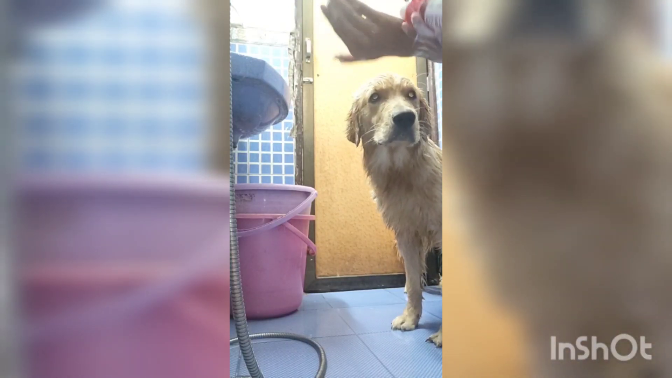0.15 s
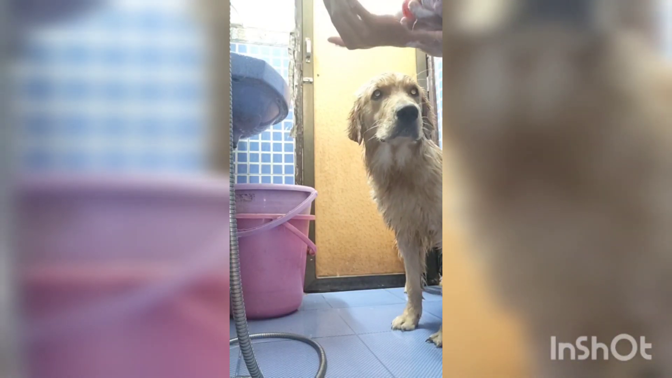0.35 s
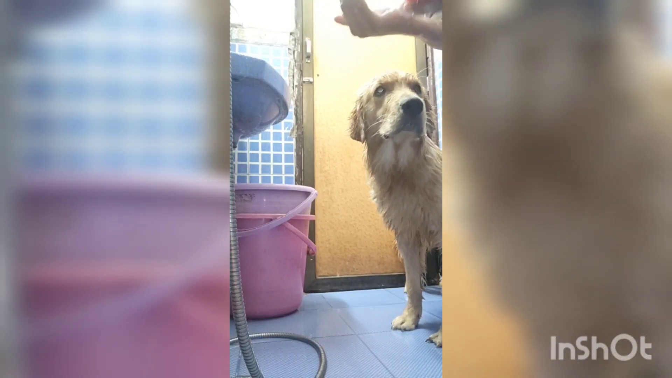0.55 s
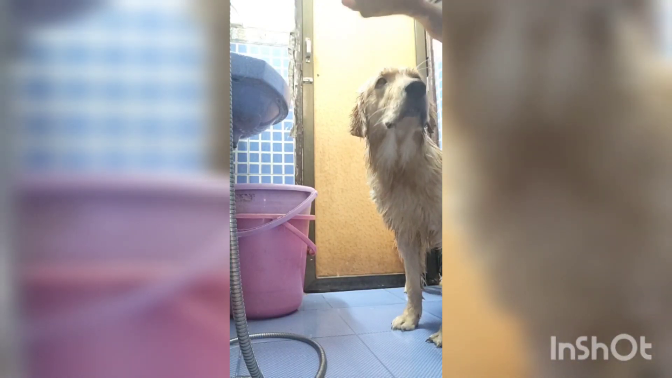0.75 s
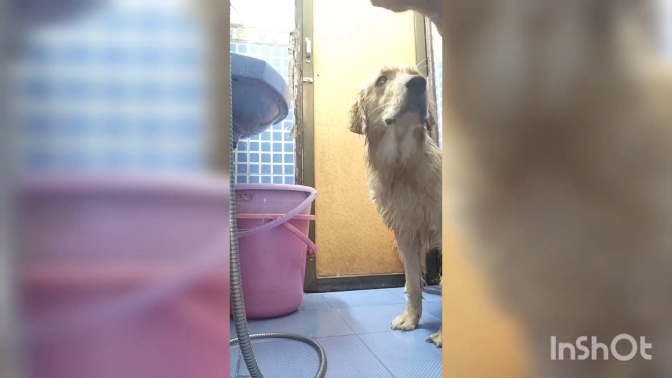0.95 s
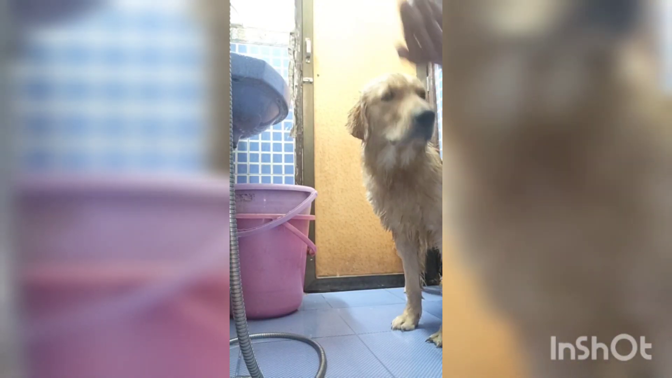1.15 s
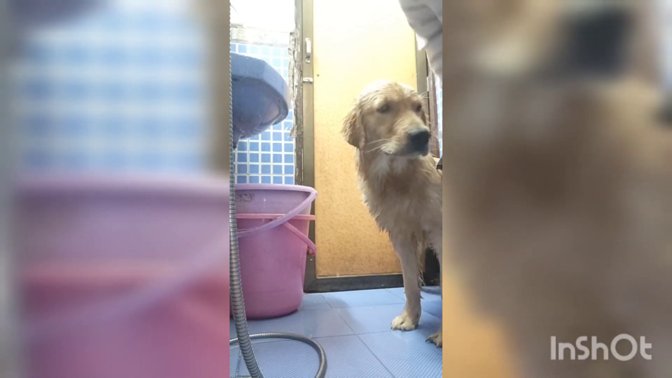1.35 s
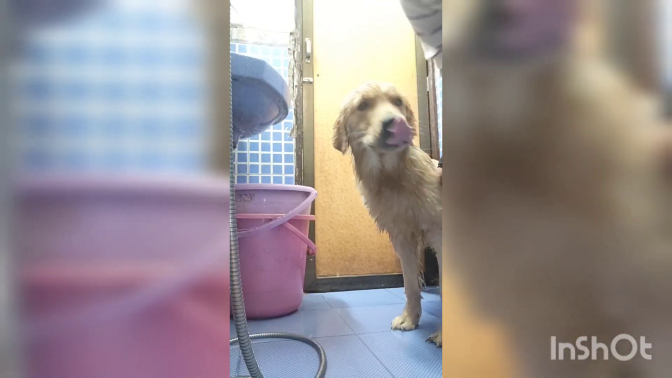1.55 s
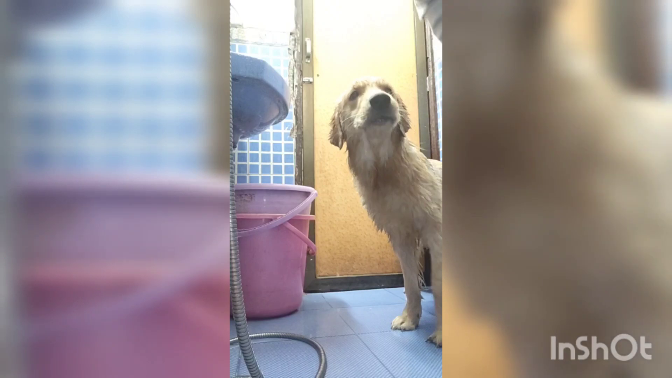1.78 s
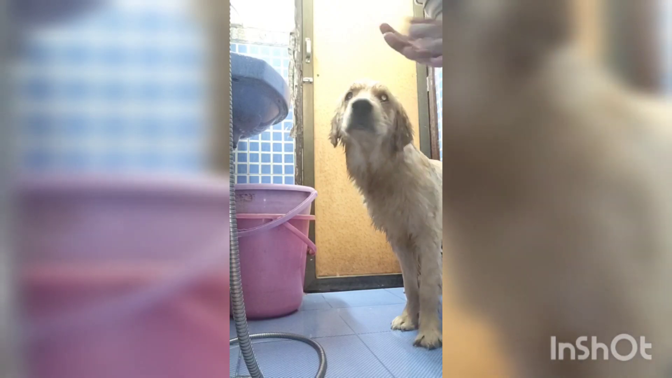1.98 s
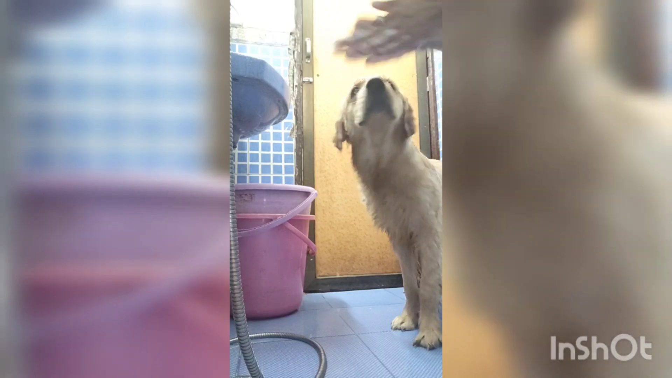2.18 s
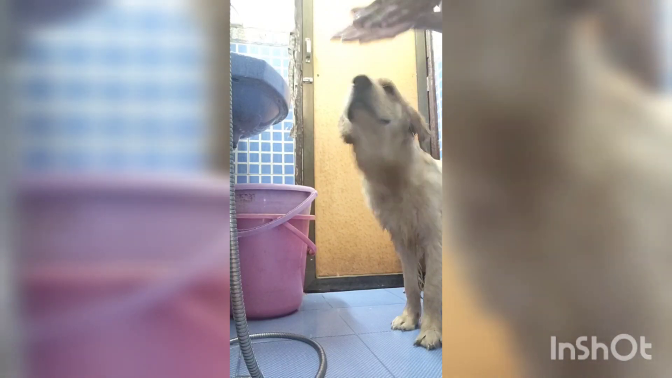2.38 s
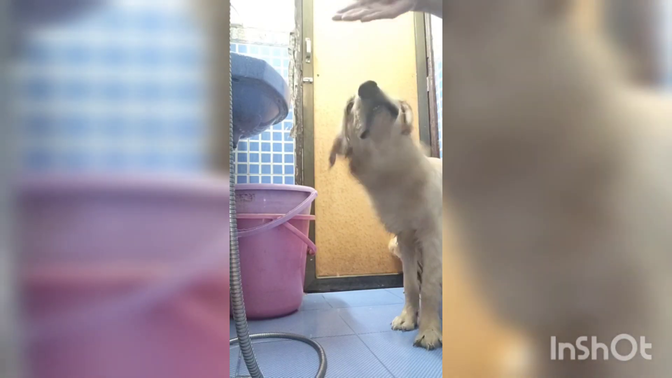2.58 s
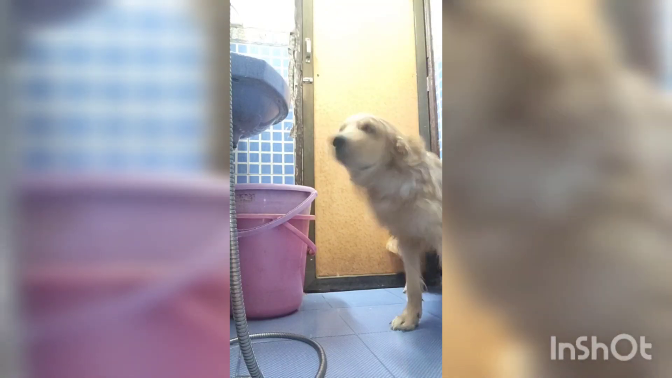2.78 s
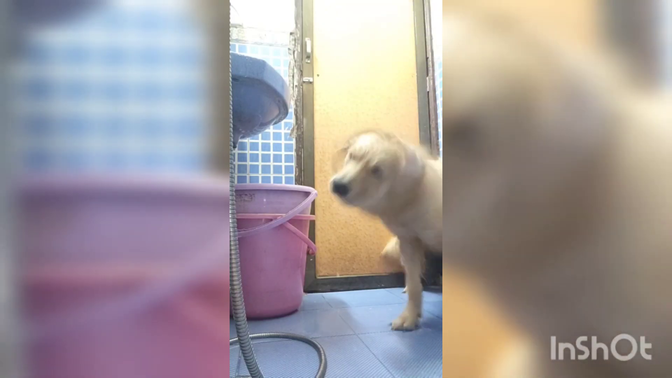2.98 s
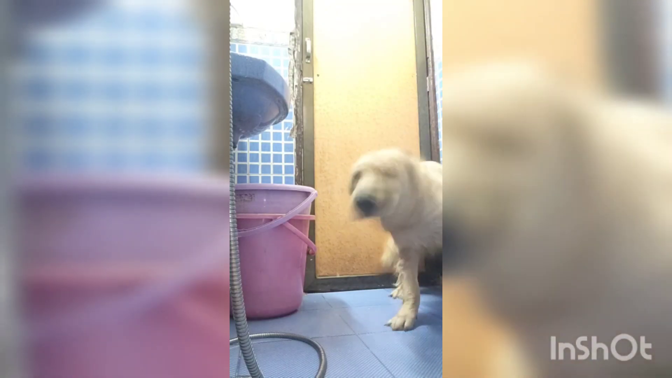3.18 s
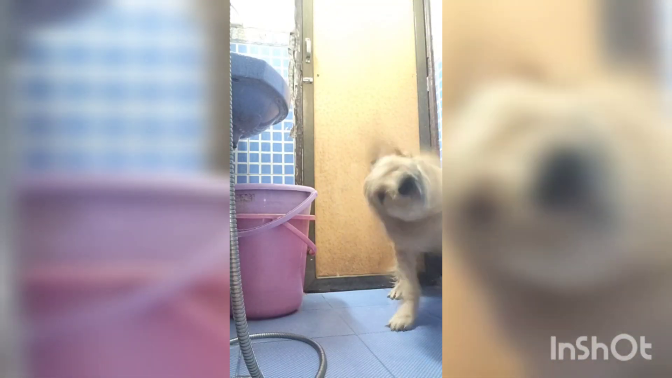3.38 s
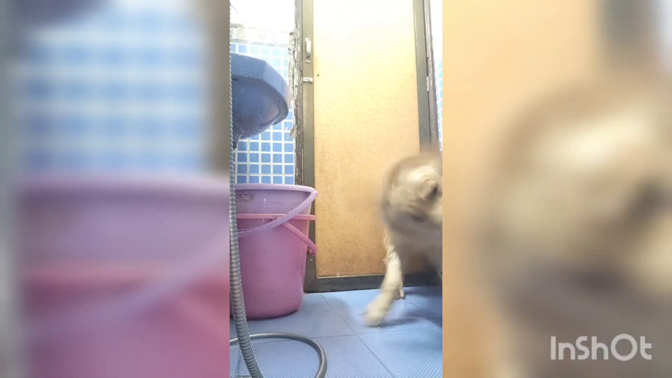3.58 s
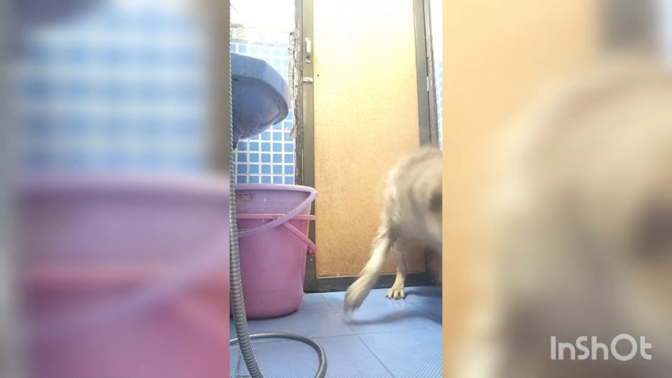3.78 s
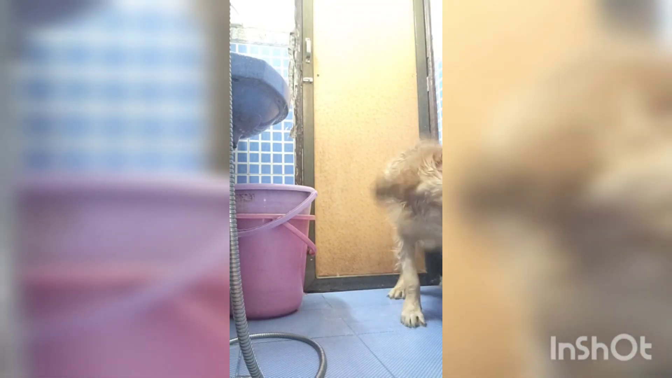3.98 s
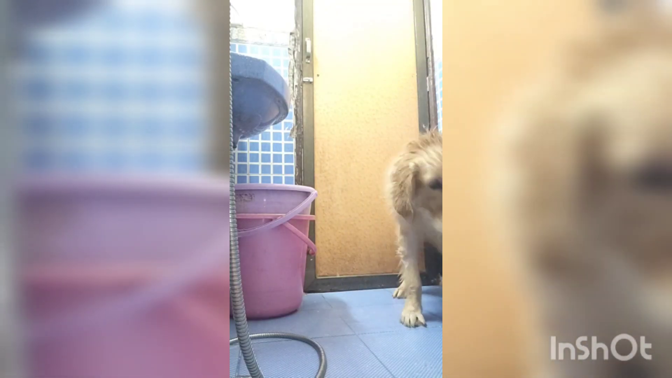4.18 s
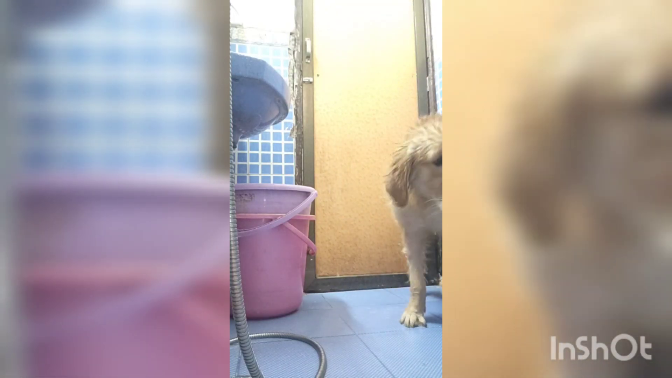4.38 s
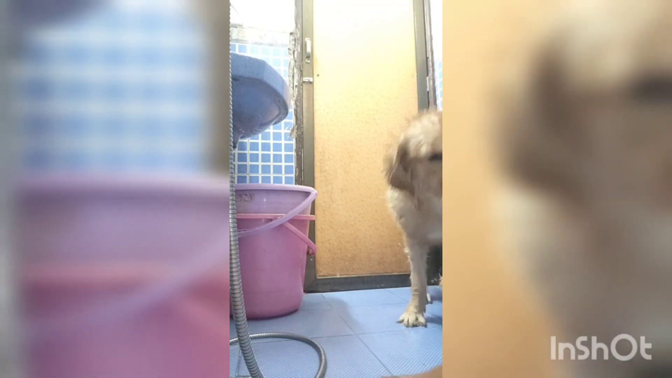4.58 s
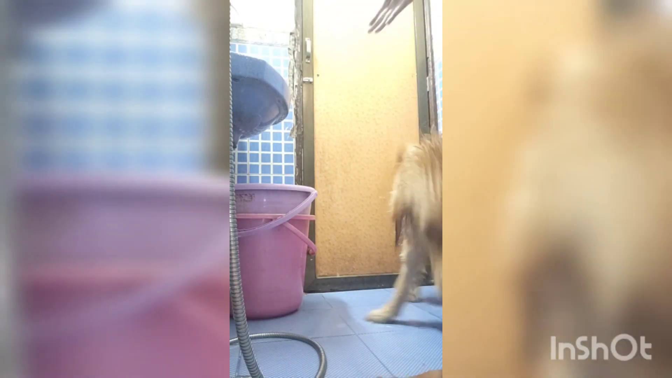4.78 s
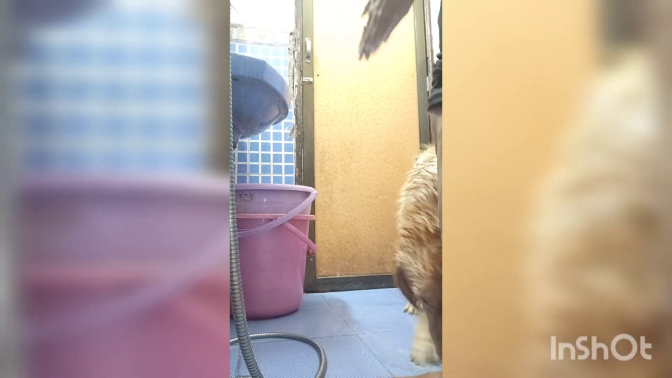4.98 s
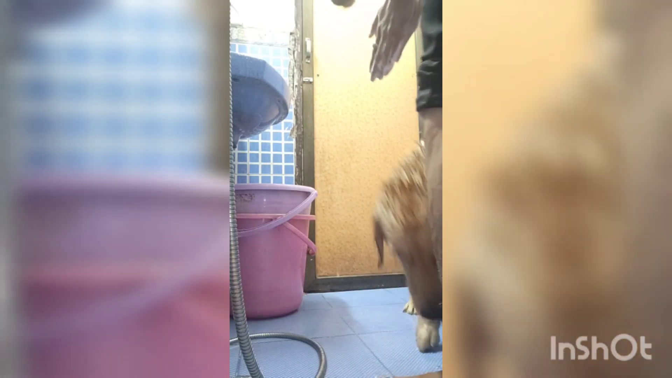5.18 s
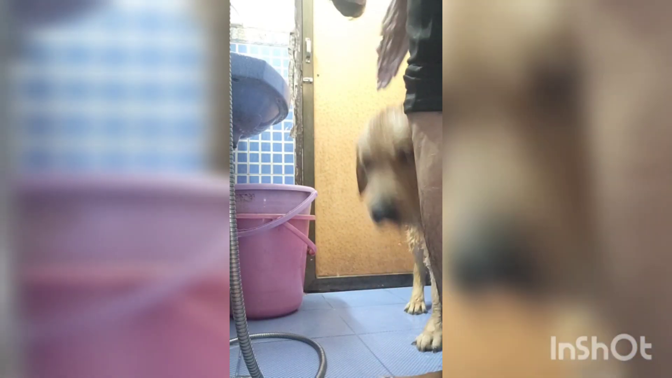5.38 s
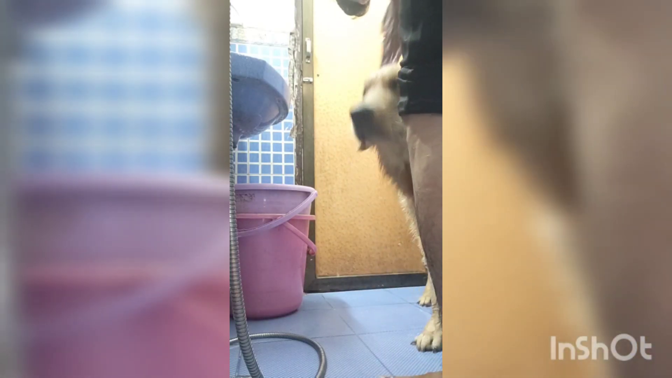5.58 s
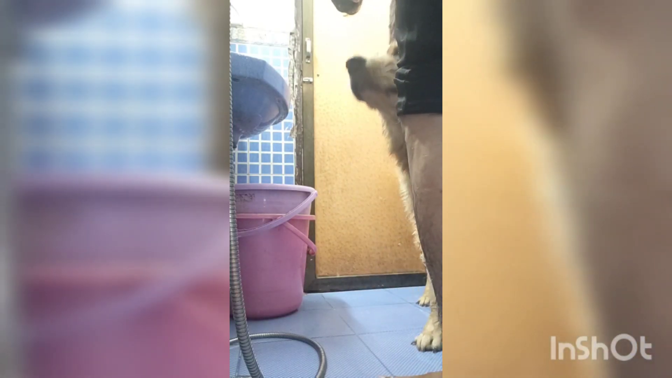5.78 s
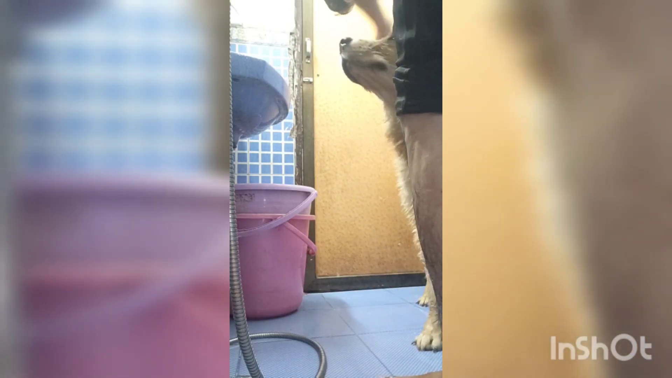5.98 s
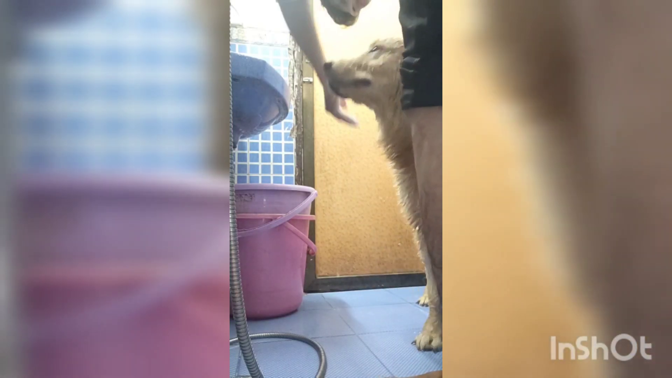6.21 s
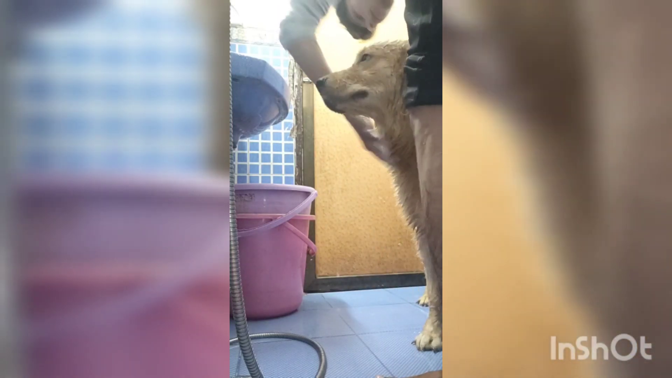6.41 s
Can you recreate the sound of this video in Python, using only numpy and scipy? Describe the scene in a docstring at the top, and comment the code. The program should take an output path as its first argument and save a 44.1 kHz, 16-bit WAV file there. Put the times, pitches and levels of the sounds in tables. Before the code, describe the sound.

Low pulsing machine hum in an echoing bathroom; paw squeaks and ticks lead into rapid wet fur flapping, skin thumps and flung water.

```python
"""A wet dog in a small tiled bathroom snuffles, steps about and shakes itself. Ears and coat slap as clouds
of droplet impacts, loose skin thumps as pressure pulses, paws squeak by stick-slip, and spray patters as
shaped noise. A machine throbs through the wall as beating tones, and drops and claws tick as short rings.
Faint hisses, a thin whistle and one sharp snap join in. Echoes and standing waves colour the impacts; the
left port is covered, so that side hears only a boxy bass."""
import sys
import numpy as np
from scipy import signal
from scipy.fft import rfft, irfft
from scipy.io import wavfile

SR = 44100
rng = np.random.default_rng(int(sys.argv[2]) if len(sys.argv) > 2 else 0)


def generate_wav(sig):
    """Save sig (samples, or channels by samples) to the path in sys.argv[1] as 16-bit PCM at SR."""
    pcm = np.round(np.clip(np.atleast_2d(sig).T, -1, 1) * 32767).astype(np.int16)
    wavfile.write(sys.argv[1], SR, pcm)


N = 284400
T = np.arange(N) / SR  # time in seconds


def undb(db):
    """Level law: decibels become an amplitude gain."""
    return 10 ** (np.asarray(db) / 20)


def unit(x):
    """Power normalisation: scale to rms 1."""
    return x / np.sqrt(np.mean(x ** 2))


def curves(rows):
    """Linear interpolation: each column of a table becomes a continuous control."""
    s, *columns = np.transpose(rows)
    return [np.interp(T, s, c) for c in columns]


def swell(from_s, to_s, rise_db_per_s, fall_db_per_s):
    """Exponential growth and decay: a gain rises, holds at 1 between two times and dies away."""
    rise_db = rise_db_per_s * (T - from_s)
    fall_db = fall_db_per_s * (to_s - T)
    return undb(np.minimum(0, np.minimum(rise_db, fall_db)))


def colour(x, points):
    """Spectral shaping: weight a sound by (Hz, dB) points on a log frequency axis, at rms 1."""
    hz, db = np.transpose(points)
    f = np.fft.rfftfreq(N, 1 / SR)
    gain = undb(np.interp(np.log(f + 1), np.log(hz), db))
    return unit(irfft(rfft(x) * gain, N))


def band(x, hz, kind, order=2):
    """Butterworth filtering: maximally flat within the passband."""
    sos = signal.butter(order, np.minimum(hz, SR / 2 - 1), kind, fs=SR, output="sos")
    return signal.sosfilt(sos, x)


def noise_band(n, low_hz, high_hz, order=2):
    """Band-limited noise: random pressure between two frequencies, at rms 1."""
    return unit(band(rng.standard_normal(n), [low_hz, high_hz], "band", order))


def fade(t, t60):
    """Exponential damping: decay by 60 dB in t60 seconds."""
    return np.exp(-np.log(1000) * t / t60)


def ring(modes, t):
    """Modal superposition: a sum of damped (Hz, t60, dB) cosines."""
    return sum(undb(db) * fade(t, t60) * np.cos(2 * np.pi * hz * t) for hz, t60, db in modes)


def add(track, s, sound):
    """Linear superposition: mix a two-channel sound in at time s."""
    i = int(s * SR)
    track[:, i:i + sound.shape[1]] += sound[:, :N - i]


def diffuse(n, apart_hz=750):
    """Diffuse-field coherence: noise alike at the two ports in the bass, unrelated in the treble."""
    mid, side = rfft(rng.standard_normal((2, n)))
    alike = np.exp(-(np.fft.rfftfreq(n, 1 / SR) / apart_hz) ** 2)
    shared = mid * np.sqrt((1 + alike) / 2)
    opposed = np.outer([1, -1], side * np.sqrt((1 - alike) / 2))
    return irfft(shared + opposed, n)


def droplets(n, per_s, spread_db):
    """Random impact process: tiny impacts at random moments, a few much larger than the rest, at rms 1."""
    size = undb(spread_db * np.minimum(rng.exponential(size=n), 4.5))
    sign = rng.uniform(-1.0, 1, n)
    return unit(sign * size * (rng.random(n) < per_s / SR))


# Echoes of the near walls. Each row: nominal delay in seconds, gain (a factor).
WALL_ECHOES = [(.0063, 0.43), (.0088, -0.19), (0.018, 0.26), (0.019, -0.2)]
# Standing waves between the tiles. Each row: frequency in Hz, relative level in dB.
STANDING_WAVES = [(125.5, -51.5), (172, -45.5), (230, -44.5), (317, -73), (378, -49.5), (455, -49),
                  (495, -52)]
STANDING_WAVE_T60_S = .5


def bathroom(shift, low_t60=0.13, mid_t60=0.32, high_t60=0.28, tail_db=1, mode_db=-2):
    """Room impulse response: direct sound, early reflections, a dense tail and standing waves."""
    t = T[:SR * 2 // 5]
    noise = diffuse(len(t))
    low, below = band(noise, 740, "low"), band(noise, 8300, "low")
    tail = low * fade(t, low_t60) + (below - low) * fade(t, mid_t60) + (noise - below) * fade(t, high_t60)
    tail *= 1 - np.exp(-t / 0.0042)  # the tail builds up over a few milliseconds
    response = undb(tail_db) * unit(tail) / np.sqrt(len(t))
    response[:, 0] += 1  # direct sound
    for delay, gain in WALL_ECHOES:
        delays = delay * (1 + shift * rng.uniform(-1, 1, 2))
        response[[0, 1], (delays * SR).astype(int)] += gain
    modes = [(hz, STANDING_WAVE_T60_S, db) for hz, db in STANDING_WAVES]
    response += undb(mode_db) * ring(modes, t)
    return unit(response) / np.sqrt(len(t))


def in_room(x, room):
    """Convolution: a source as it reaches the two ports."""
    return signal.fftconvolve(x[None], room)[:, :N]


def play(rows, voice, rooms):
    """Source motion: each row of a table sounds with other echoes than the one before, as the dog moves."""
    out, t = np.zeros((2, N)), T[:SR // 6]
    for k, (s, *row) in enumerate(rows):
        add(out, s, in_room(voice(t, *row), rooms[k % len(rooms)]))
    return out


def roaming(x, rooms, count=90):
    """Source motion: each short stretch of a long sound from the moving dog meets other echoes."""
    out, size = np.zeros((2, N)), N // count
    for k in range(count):
        stretch = x[k * size:(k + 1) * size]
        add(out, k * size / SR, in_room(stretch, rooms[k % len(rooms)]))
    return out


# Drift of the machine's loudness. Each row: time in seconds, relative hum level in dB,
# relative overtone level in dB.
HUM_LEVELS = [(0, -54, -42.5), (.26, -42.5, -77), (.45, -37.5, -57.5), (.95, -39.5, -56.5),
              (1.3, -53.5, -72), (1.75, -53, -71), (2, -43.5, -61), (2.26, -44, -57), (2.52, -72, -78),
              (2.76, -42.5, -66), (3, -51, -68), (3.2, -39.5, -40.5), (5.25, -52, -52), (5.72, -43, -44.5),
              (5.94, -43.5, -45.5), (6.44, -33, -42)]
# Progress of the beating, whose rate varies. Each row: time in seconds, beats done (a count).
BEAT_COUNT = [(-.08, -1), (1.14, 9), (1.23, 10), (2.43, 20), (2.535, 21), (3.13, 26), (5.23, 44),
              (5.94, 50), (6.53, 55)]
# Depth of the hum's dip at each beat. Each row: time in seconds, exponent (0 steady, 1 full beat).
BEAT_DEPTH = [(0, .5), (1.1, .7), (1.8, .35), (3, .3), (5, 1.6), (5.4, 1.5), (5.85, .9), (6.1, .35),
              (6.45, .2)]
HUM_HZ, UNDER_HZ, OVERTONE_HZ = 135.5, 118.6, 224.7
BEAT_SKEW = .72  # 1 is even; below 1 each beat rises faster than it falls


def machine(hum_db=2, under_db=-13, overtone_db=1, waver_db=-25, rattle_db=-11, left_lag_s=0.00005):
    """Amplitude modulation: a hum dips about eight times a second, and a rougher overtone beats with it."""
    level_db, upper_db = curves(HUM_LEVELS)
    beats, = curves(BEAT_COUNT)
    depth, = curves(BEAT_DEPTH)
    swing = np.sin(np.pi * (np.floor(beats) + (beats % 1) ** BEAT_SKEW))
    t = T - np.array([[left_lag_s], [0]])
    tones = np.sin(2 * np.pi * HUM_HZ * t) + undb(under_db) * np.sin(2 * np.pi * UNDER_HZ * t)
    waver = undb(waver_db) * noise_band(N, 100, 165, order=3)
    rattle = undb(rattle_db) * noise_band(N, 195, 275, order=3)
    hum = np.abs(swing) ** depth * tones + waver
    overtone = swing * (np.sin(2 * np.pi * OVERTONE_HZ * t) + rattle)
    return np.sqrt(2) * (undb(level_db + hum_db) * hum + undb(upper_db + overtone_db) * overtone)


# Spectrum of the quiet room. Each row: frequency in Hz, relative level in dB.
STILL_AIR_SPECTRUM = [(15, -64), (25, -23), (64, -26), (106, 2), (135, 6.5), (163, -6.5), (191, -6.5),
                      (264, -26), (350, -8.5), (470, -20), (560, -11.5), (700, -14), (860, -27.5),
                      (1390, -26), (1630, -36), (15000, -78)]


def still_air(level_db=-53):
    """Diffuse background field: steady noise, strongest in the bass."""
    return undb(level_db) * colour(diffuse(N), STILL_AIR_SPECTRUM)


# Spectra of unsticking hairs, fine spray and the moving body.
# Each row: frequency in Hz, relative level in dB.
RUSTLE_SPECTRUM = [(410, -67), (700, 4), (801, -12), (876, 6.5), (950, -6.5), (1050, -1.5), (1770, -1),
                   (3060, -1.5), (6000, -16), (7800, -46), (13200, -120)]
MIST_SPECTRUM = [(2350, -12.5), (4000, -2.5), (4350, -3.5), (4480, -1.5), (5460, 0.5), (5810, -2.5),
                 (8550, -0.5), (10400, -7.5), (15500, -21)]
SWISH_SPECTRUM = [(160, -23), (270, -12), (312, -9), (355, 4), (453, -2.5), (495, -7), (548, 6),
                  (680, -11.5), (880, -7.5), (1500, -120)]
# How hard the dog shakes, from the first toss of the head to the last swing.
# Each row: time in seconds, relative effort in dB.
SHAKE_EFFORT = [(2.4, -81), (2.48, -58.5), (3.248, -45), (3.5, -43), (3.61, -39), (3.8, -34.5),
                (4.1, -42.5), (4.29, -40), (4.82, -41)]
# Separate small movements that rustle the coat. Each row: start in seconds, end in seconds,
# relative rustle level in dB, relative mist level in dB, relative swish level in dB.
COAT_STIRS = [(0, 0.006, -50.5, -51, -50.5), (.088, .13, -64, -86, -53), (1.394, 1.553, -48.5, -50.5, -45),
              (2.085, 2.197, -59, -65, -55), (2.333, 2.365, -60, -57, -63), (2.5, 2.704, -76, -61, -63),
              (4.906, 4.946, -33.5, -37.5, -39), (5.146, 5.292, -51.5, -59, -60),
              (5.58, 5.818, -61, -61.5, -93), (5.946, 6.25, -66.5, -74, -72), (6.306, 6.464, -62, -66, -60)]
STIR_RISE_DB_PER_S, STIR_FALL_DB_PER_S = 153, 108


def coat(rooms, rustle_db=3, mist_db=-1, swish_db=-2, stir_db=5, rest_rustle_db=-75, rest_mist_db=-83,
         clump_db=4):
    """Granular noise: wet hairs unstick and fine spray lands in clumps over a soft swish, as effort sets."""
    effort_db, = curves(SHAKE_EFFORT)
    shake = undb(effort_db) * swell(SHAKE_EFFORT[0][0], SHAKE_EFFORT[-1][0], rise_db_per_s=151, fall_db_per_s=76)
    rustle = undb(rest_rustle_db) + undb(rustle_db) * shake
    mist = undb(rest_mist_db) + undb(mist_db) * shake
    swish = undb(swish_db) * shake
    # independent noises add in power
    for from_s, to_s, hair_db, fine_db, body_db in COAT_STIRS:
        stir = swell(from_s, to_s, STIR_RISE_DB_PER_S, STIR_FALL_DB_PER_S)
        rustle = np.hypot(rustle, undb(hair_db + stir_db) * stir)
        mist = np.hypot(mist, undb(fine_db + stir_db) * stir)
        swish = np.hypot(swish, undb(body_db) * stir)
    clumps = undb(clump_db * np.tanh(unit(band(rng.standard_normal(N), 33, "low"))))
    patter = roaming(clumps * droplets(N, per_s=700, spread_db=1.5), rooms)
    hair_and_spray = rustle * colour(patter, RUSTLE_SPECTRUM) + mist * colour(patter, MIST_SPECTRUM)
    return hair_and_spray + swish * colour(diffuse(N), SWISH_SPECTRUM)


# Faint separate hisses. Each row: middle in seconds, half length in seconds, centre in Hz,
# width in Hz, level in dB.
FAINT_HISSES = [(0.25, 0.23, 1630, 380, -48), (1, 0.19, 1240, 330, -71), (1.9, 0.089, 1040, 56, -60.5),
                (2.556, 0.17, 2100, 950, -50.5), (5.25, 0.044, 1350, 600, -39),
                (5.92, .075, 1390, 350, -50), (6.3, 0.56, 5120, 590, -66), (6, 0.7, 7760, 1500, -68),
                (6.32, .3, 1470, 310, -57.5), (6.05, 0.42, 1030, 110, -61.5)]


def hisses():
    """Narrow-band noise: faint hisses come and go under Gaussian envelopes."""
    out = np.zeros(N)
    for s, half, hz, width, db in FAINT_HISSES:
        envelope = np.exp(-((T - s) / half) ** 2)
        out += undb(db) * envelope * noise_band(N, hz - width / 2, hz + width / 2)
    return out


# Drops and claws ticking. Each row: start in seconds, relative level in dB, settled pitch in Hz,
# after-ring t60 in seconds, splash in dB relative to the ring.
DROP_AND_CLAW_TICKS = [(0.2212, -56, 3340, .02, -9), (1.078, -69.5, 1444, 0.069, -25),
                       (1.1293, -62, 5500, 0.045, -14), (2.0247, -43.5, 3960, 0.039, -7),
                       (2.1184, -43.5, 2240, 0.04, -17), (2.2402, -41, 1350, 0.039, -16),
                       (2.8485, -39.5, 5530, 0.066, -10), (2.905, -35, 1456, 0.083, -12),
                       (3.817, -26, 9600, 0.12, -22), (5.2658, -39.5, 1700, 0.026, -15),
                       (5.7464, -42, 2110, 0.037, -9.5), (6.2876, -40, 7770, 0.06, -7)]


def tick(t, db, hz, t60, splash_db, gain_db=6, width=0.11, blur_db=-2, pop_t60=0.014, sag=0.06, sag_s=0.0034):
    """Damped resonance: a small wet impact pops, sags in pitch and leaves a blurred after-ring and splash."""
    phase = 2 * np.pi * np.cumsum(hz * (1 + sag * np.exp(-t / sag_s))) / SR
    blur = unit(band(rng.standard_normal(len(t)), width * hz, "low"))
    size = 2 * fade(t, pop_t60) + undb(blur_db) * blur * fade(t, t60)
    splash = noise_band(len(t), 1500, 9000, order=3) * fade(t, 0.17)
    return undb(db + gain_db) * (size * np.sin(phase) + undb(splash_db) * splash)


# One sharp snap: start in seconds, relative level in dB.
SNAP_EVENT = (.3142, -23.5)
# What the snap rings with. Each row: frequency in Hz, t60 in seconds, relative level in dB.
SNAP_RESONANCES = [(530, 0.03, -9.5), (1240, 0.01, 3), (1700, 0.0027, -17), (3440, 0.0066, -16),
                   (4730, 0.0088, 2), (6250, 0.0055, 2.5), (6650, 0.005, -9), (10200, 0.0022, -4)]


def snap(t, db, scatter_db=-22, scatter_t60=0.18, crack_db=8, crack_t60=0.0094):
    """Impulse excitation of modes: a broad crack, then smaller ones that scatter and ring."""
    push = undb(scatter_db) * droplets(len(t), per_s=1200, spread_db=5.0) * fade(t, scatter_t60)
    push[0] += .5
    crack = undb(crack_db) * droplets(len(t), per_s=18000, spread_db=4.5) * fade(t, crack_t60)
    rung = signal.fftconvolve(push, ring(SNAP_RESONANCES, t))[:len(t)]
    return undb(db) * band(rung + crack, [300, 9500], "band", order=5)


# Loose skin and ears thumping on the body. Each row: start in seconds, relative level in dB,
# pitch in Hz, flutter in dB, clap in dB and wet smack in dB, these three relative to the puff or thud.
SKIN_THUMPS = [(.643, -50, 560, -13, -5, -21), (1.557, -27, 454, -7, 0.5, -16),
               (1.827, -47, 546, -11, -2, -22), (3.166, -27.5, 476, -10, -8, -9),
               (3.285, -24.5, 450, -10, -4.5, -8), (3.401, -23, 444, -4, -4, -14),
               (3.428, -19, 194, -13, -22, -16), (3.523, -28.5, 256, -1, 3, -8),
               (3.66, -24, 425, -7, -7, -12), (3.754, -15, 537, -4.5, -17, -6),
               (3.882, -17, 507, -2, -13, -8.5), (3.921, -21.5, 168, -18, 5.5, -7),
               (3.938, -17.5, 500, -5.5, -14, -10), (3.98, -11, 208, -10, -7, -22),
               (3.999, -13.5, 226, -16, -16, -28), (4.039, -19, 195, -9, -20, -19),
               (4.126, -20.5, 161, -12, -20, -26), (4.146, -16.5, 486, -9.5, -8, -17),
               (4.163, -15.5, 500, -12.5, -2, -27), (4.198, -20.5, 175, -3, -12, -25),
               (4.255, -19.5, 164, -25, 1, -8.5), (4.286, -21.5, 400, -7.5, -17, -21),
               (4.327, -22, 165, -20, -12, -24), (4.4, -21, 238, -15, -20, -24),
               (4.448, -12.5, 279, -16, 1, -16), (4.463, -16.5, 334, -8, -8, -20),
               (4.499, -20, 190, -8, -5, -11), (4.545, -26, 183, -12, -10, -22),
               (4.584, -23, 180, -21, -18, -24), (4.616, -20.5, 170, -4.5, 0, -8),
               (4.638, -21, 169, -16, -12, -20), (4.674, -16.5, 170, -18, -16, -21),
               (4.693, -9, 433, -11, -8.5, -16.5), (4.699, -14, 202, -18, -23, -26),
               (4.722, -22, 484, -11, -8, -22), (4.749, -18.5, 198, -15, 1.5, -18),
               (4.772, -27, 450, -5, -12, -24), (4.795, -19, 173, -16, -20, -26),
               (4.832, -24, 168, -22, -26, -28), (4.924, -22, 455, 1, -8, -14)]


def thump(t, db, hz, flutter_db, clap_db, smack_db, gain_db=2, flutter_s=0.011, clap_hz=560, smack_s=0.015):
    """Pressure pulse: a flap of skin claps with a wet smack, squeezes out one puff of air and flutters."""
    # both pulses peak 2 ms in
    puff, clap = ((1 - 2 * u ** 2) * np.exp(-u ** 2) for u in np.pi * np.outer([hz, clap_hz], t - .002))
    flutter = noise_band(len(t), 0.78 * hz, 2.0 * hz, order=3) * np.exp(-t / flutter_s)
    wet = droplets(len(t), per_s=1400, spread_db=2.5)
    smack = unit(band(wet, [700, 1300], "band", order=3)) * np.exp(-t / smack_s)
    thud = band(puff + undb(clap_db) * clap + undb(flutter_db) * flutter, [90, 1200], "band")
    return undb(db + gain_db) * (thud + undb(smack_db) * smack)


WHISTLE_HZ, WHISTLE_DB = 3677, -77.5
WHISTLE_FROM_S, WHISTLE_TO_S = 1, 1.3


def thin_whistle(width_hz=60):
    """Narrow-band noise: a band so thin that it is heard as a faint, slightly unsteady tone."""
    tone = noise_band(N, WHISTLE_HZ - width_hz / 2, WHISTLE_HZ + width_hz / 2)
    return undb(WHISTLE_DB) * swell(WHISTLE_FROM_S, WHISTLE_TO_S, rise_db_per_s=100, fall_db_per_s=150) * tone


# Short falling squeaks, likely wet pads slipping on the tiles. Each row: start in seconds, level in dB,
# first pitch in Hz, last pitch in Hz, length in seconds, scrape in dB relative to the tone.
PAW_SQUEAKS = [(1.2115, -34.5, 3250, 2250, 0.0117, -11), (2.001, -33.5, 2890, 2100, 0.01, -23),
               (2.008, -39, 3300, 2400, 0.011, -15), (2.86, -30.5, 2780, 2265, 0.03, -19),
               (3.05, -27.5, 3264, 2560, 0.016, -19), (3.085, -22, 2540, 2260, 0.0175, -14),
               (5.312, -32, 3440, 2870, 0.0115, 0), (5.321, -20, 2700, 2260, 0.0083, -14.5),
               (5.331, -21, 2544, 2000, 0.0073, -22), (5.64, -33.5, 2144, 1780, 0.012, -2.5),
               (5.65, -30.5, 2470, 1950, 0.0086, -11)]


def squeak(t, db, from_hz, to_hz, length, scrape_db, rough=0.37, rough_hz=500):
    """Stick-slip friction: a brief, rough tone slides down, with a little scraping."""
    done = np.minimum(t / length, 1)
    phase = 2 * np.pi * np.cumsum(from_hz + (to_hz - from_hz) * done) / SR
    grip = 1 + rough * unit(band(rng.standard_normal(len(t)), rough_hz, "low", order=1))
    scrape = noise_band(len(t), 1400, 8500)
    return undb(db) * np.sin(np.pi * done) * (grip * np.sin(phase) + undb(scrape_db) * scrape)


def wet_grains(t, within_s, count=9, low_hz=1000, high_hz=7000, cycles=22, spread_db=4):
    """Damped oscillation: a few larger drops land apart from one another, each a tiny pitched plip."""
    out, u = np.zeros(len(t)), T[:SR // 40]
    for when, pitch, size in rng.random((count, 3)):
        hz = low_hz * (high_hz / low_hz) ** pitch
        i = int(min(when ** 2 * within_s, t[-1] / 2) * SR)
        plip = np.sin(2 * np.pi * hz * u) * fade(u, cycles / hz)
        out[i:i + len(u)] += undb(spread_db * (2 * size - 2.5)) * plip
    return out


# Tufts of fur hit one after another, so a slap is uneven; its larger drops land over a short while.
TUFT_DB, TUFT_HZ, DROP_DB, DROP_SPREAD_S = 4.5, 180, 0, .08
DROP_CEILING = 3.5  # soft limit on droplet bursts, as a multiple of the cloud's rms


def slap(t, splash, body, spray, attack, length, pocket_hz, pocket_db, body_db=7.0, splash_db=-5, spray_db=7):
    """Impact noise: a slap throws an uneven cloud of dull, middle and fine droplets, and larger drops."""
    dull, middle, fine = (droplets(len(t), per_s=3500, spread_db=1.5) for _ in range(3))
    sound = (undb(body + body_db) * unit(band(dull, [650, 2500], "band"))
             + undb(splash + splash_db) * unit(band(middle, [2300, 6500], "band"))
             + undb(spray + spray_db) * unit(band(fine, [6500, 11000], "band", order=3)))
    # a pocket of air in the wet fur colours each slap differently
    sound = sound + undb(pocket_db) * band(sound, [.89 * pocket_hz, 1.12 * pocket_hz], "band", order=1)
    unevenness = np.tanh(unit(band(rng.standard_normal(len(t)), TUFT_HZ, "low")))
    tufts = unit(undb(TUFT_DB * unevenness))
    envelope = (1 - np.exp(-t / attack)) * np.exp(-t / (attack + length))
    drops = undb((body + splash) / 2 + DROP_DB) * wet_grains(t, DROP_SPREAD_S)
    crowd = DROP_CEILING * np.sqrt(np.mean(sound ** 2))
    return crowd * np.tanh(sound * tufts / crowd) * envelope + drops


# Wet slaps of ears, coat and paws. Each row: start in seconds, relative splash level in dB,
# relative body level in dB, relative spray level in dB, attack in seconds,
# length in seconds (added to the attack, the decay constant), air pocket in Hz, pocket gain in dB.
WET_SLAPS = [(1.222, -25, -38.5, -44.5, 0.0049, 0.016, 2420, -23),
             (1.5254, -42, -31, -58, 0.0015, 0.0049, 1140, 9),
             (2.454, -34.5, -52, -66, 0.00069, 0.0039, 2800, 11.5),
             (2.551, -31, -48.5, -58, 0.0028, 0.007, 1760, 7),
             (2.667, -36, -37.5, -58, 0.0074, 0.011, 1480, -1),
             (2.756, -43.5, -43.5, -62, 0.0011, 0.44, 1110, -13),
             (2.896, -24.5, -32, -55, 0.0022, 0.014, 3100, -2.5),
             (3.046, -24, -29.5, -55, 0.0087, 0.015, 3170, 5),
             (3.085, -22.5, -35, -41, 0.0047, 0.015, 2330, 10.5),
             (3.1636, -24, -29, -41, 0.0011, 0.0079, 1270, 0),
             (3.216, -16.5, -37, -54, 0.012, 0.014, 4400, -11),
             (3.282, -17, -23, -35, 0.0061, 0.0097, 1320, -3),
             (3.3057, -19, -35, -32.5, 0.0011, 0.018, 9100, 1),
             (3.388, -15.5, -33, -38, 0.0026, 0.011, 4000, -8),
             (3.3985, -20.5, -26, -34, 0.002, 0.018, 1170, -10),
             (3.518, -18, -26.5, -32, 0.005, 0.011, 3740, -10),
             (3.6212, -10, -22.5, -33, 0.00092, 0.029, 4900, -10),
             (3.667, -8.5, -24, -29, 0.0017, 0.0074, 1830, 5),
             (3.698, -10.5, -29, -38, 0.0018, 0.0047, 2100, 8),
             (3.755, -26, -20.5, -28.5, .0014, .011, 1610, -1),
             (3.815, -11.5, -28, -35, 0.0014, 0.0095, 10100, -3),
             (3.866, -17.5, -29.5, -38, 0.0039, 0.027, 2970, -7),
             (3.988, -12.5, -27, -39, 0.0069, 0.019, 5160, -4),
             (4.072, -23, -36, -39.5, 0.0083, 0.019, 8500, -4),
             (4.168, -24, -51, -39, 0.0036, 0.0092, 3720, 1),
             (4.245, -23, -50, -36, 0.0047, .008, 6500, -8),
             (4.293, -32, -37.5, -38.5, 0.0095, 0.032, 8060, -13),
             (4.432, -20.5, -34, -37, 0.0026, 0.0054, 4700, 2),
             (4.492, -16, -32, -34, 0.0013, 0.0047, 1950, -8),
             (4.56, -17.5, -32.5, -34.5, 0.0046, 0.019, 3450, -2.5),
             (4.6132, -10.5, -20.5, -27.5, 0.0024, 0.0039, 6760, -4),
             (4.689, -24, -49, -54, 0.0025, 0.005, 3970, 8),
             (4.774, -26, -33.5, -54, .001, 0.01, 3070, 4.5), (4.843, -22, -48, -46, .004, .02, 2300, 7),
             (4.9245, -14.5, -18.5, -40, 0.00093, 0.0043, 2100, 4.5),
             (5.052, -18, -31.5, -48, .0006, .011, 4200, -1),
             (5.6, -37.5, -64, -59, 0.0021, 0.0074, 2720, 6.5),
             (5.76, -30.5, -43, -74, 0.0035, 0.0051, 2770, -3)]


def scattered(rooms, count=4, sweep_hz=90, gain_db=3):
    """Moving-source reflection: flung water sweeps the room, so each slap meets several sets of echoes."""
    out, t = np.zeros((2, N)), T[:SR // 7]
    for k, (s, *row) in enumerate(WET_SLAPS):
        sound = undb(gain_db) * slap(t, *row)
        for spot in range(count):
            share = (1 + np.cos(2 * np.pi * (sweep_hz * t - spot / count))) / count
            add(out, s, in_room(share * sound, rooms[(k + spot) % len(rooms)]))
    return out


# Spectra of the nostrils and the throat. Each row: frequency in Hz, relative level in dB.
NOSE_SPECTRUM = [(470, -43), (800, -8), (1050, 1.5), (1230, -2.5), (1590, 1), (1860, -2.5), (3620, -4),
                 (3990, -1.5), (4560, -5.5), (5290, -4.5), (6760, -9.5), (8030, -12), (12500, -22),
                 (13800, -36), (15000, -35)]
THROAT_SPECTRUM = [(76, -30), (130, 3.5), (162, -11), (227, 1), (302, -6.5), (449, 3), (498, -26),
                   (545, -5), (900, -34), (1170, -57), (1980, -120)]
# Air flows at full strength between the first two times, with a sharp puff at the third.
SNUFFLE_FROM_S, SNUFFLE_TO_S, PUFF_S = 1.437, 1.666, 1.527


def snuffle(hiss_db=-39, throat_db=-42, whistle_db=-38, whistle_hz=5300, puff_hiss_db=-34, puff_throat_db=-30):
    """Turbulent flow: air hisses through nostrils and throat, whistles a little, then puffs."""
    flow = swell(SNUFFLE_FROM_S, SNUFFLE_TO_S, rise_db_per_s=129, fall_db_per_s=131)
    drawn = swell(SNUFFLE_FROM_S, PUFF_S, rise_db_per_s=205, fall_db_per_s=150)
    puff = swell(PUFF_S, PUFF_S, rise_db_per_s=2000, fall_db_per_s=216)
    nose = (undb(hiss_db) * flow + undb(puff_hiss_db) * puff) * colour(diffuse(N), NOSE_SPECTRUM)
    throat = (undb(throat_db) * flow + undb(puff_throat_db) * puff) * colour(diffuse(N), THROAT_SPECTRUM)
    whistle = noise_band(N, .93 * whistle_hz, 1.07 * whistle_hz)
    return nose + throat + undb(whistle_db) * drawn * whistle


# Low flutter, shaped by the trunk's resonances. Each row: frequency in Hz, relative level in dB.
TRUNK_SPECTRUM = [(41, -34), (58, -23), (70, -2.5), (91, -2), (105, -6.5), (124, 5), (145, -4), (172, -2.5),
                  (199, -5), (221, -6), (237, 4), (281, -15), (305, -33), (330, -3.5), (430, -28),
                  (730, -120)]
# The shake travels back to the trunk, which joins in, swings fully between two times and slows as it goes.
TRUNK_JOINS_S, TRUNK_FROM_S, TRUNK_TO_S, TRUNK_RISE_DB_PER_S = 3.12, 3.84, 4.824, 70
SWINGS_PER_S, SLOWING_PER_S2 = 7.77, 2.8  # rate at TRUNK_FROM_S, and its loss each second


def trunk(level_db=-32, swing_db=3.0):
    """Modulated flow noise: air flutters low around the twisting body, strongest at each swing."""
    t = T - TRUNK_FROM_S
    swings = SWINGS_PER_S * t - SLOWING_PER_S2 * t ** 2 / 2
    twist = swell(TRUNK_FROM_S, TRUNK_TO_S, rise_db_per_s=29.0, fall_db_per_s=101)
    onset = undb(np.minimum(0, TRUNK_RISE_DB_PER_S * (T - TRUNK_JOINS_S)))
    pulse = undb(level_db + swing_db * np.cos(2 * np.pi * swings))
    return onset * twist * pulse * colour(diffuse(N), TRUNK_SPECTRUM)


FLING_S = 4.905  # the last swing flings a sheet of spray at the walls


def fling(coarse_db=-25, fine_db=-26, coarse_lag_s=0.017):
    """Dense impact noise: spray swells and dies away on the tiles, the fine drops before the coarse ones."""
    coarse = unit(band(diffuse(N), [1650, 5200], "band"))
    fine = unit(band(diffuse(N), [5100, 9600], "band"))
    coarse_s = FLING_S + coarse_lag_s
    early = swell(FLING_S, coarse_s, rise_db_per_s=298, fall_db_per_s=207)
    late = swell(coarse_s, coarse_s, rise_db_per_s=155, fall_db_per_s=188)
    return undb(coarse_db) * late * coarse + undb(fine_db) * early * fine


WALL_SHIFT = .3  # echoes come sooner or later as the dog moves, by up to this share of their delay


def scene(count=9):
    """Superposition: all sources at the two ports; the thumps keep fixed wall delays."""
    rooms = [bathroom(WALL_SHIFT) for _ in range(count)]
    close = [bathroom(0, low_t60=0.2, tail_db=2, mode_db=-1.5) for _ in range(count)]
    background = machine() + still_air() + hisses() + thin_whistle()
    impacts = (play(DROP_AND_CLAW_TICKS, tick, rooms) + play([SNAP_EVENT], snap, rooms)
               + play(SKIN_THUMPS, thump, close) + scattered(rooms))
    squeaks = play(PAW_SQUEAKS, squeak, rooms)
    return background + impacts + squeaks + coat(rooms) + snuffle() + trunk() + fling()


TOP_HZ = 15600  # nothing passes above this


def record(dry, port_hz=560, port_width=0.38, covered_db=-1.5, open_db=1, leak_db=-46, hiss_db=-85):
    """Cavity resonance: the covered left port booms at its resonance and shuts out the treble."""
    w = 2 * np.tan(np.pi * port_hz / SR) * SR  # prewarped for the bilinear transform
    cavity = signal.lfilter(*signal.bilinear([w * w], [1, port_width * w, w * w], SR), dry[0])
    left = undb(covered_db) * cavity - undb(leak_db) * dry[0]
    ports = np.array([left, undb(open_db) * dry[1]])
    ports = ports + undb(hiss_db) * rng.standard_normal((2, N))
    return signal.sosfilt(signal.ellip(12, .2, 80, TOP_HZ, fs=SR, output="sos"), ports)


dry = scene()
out = record(dry)
generate_wav(out)
```